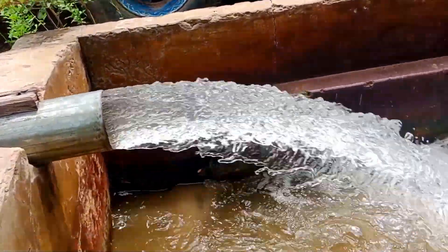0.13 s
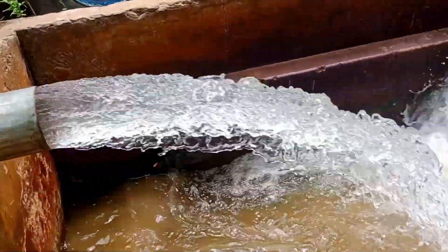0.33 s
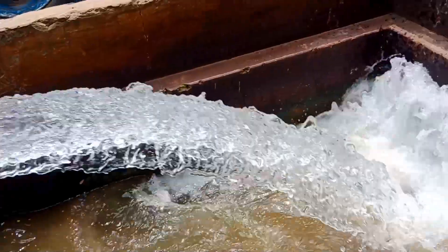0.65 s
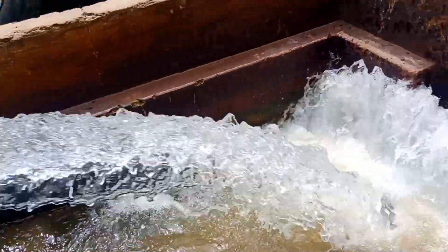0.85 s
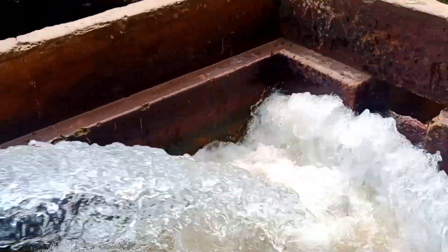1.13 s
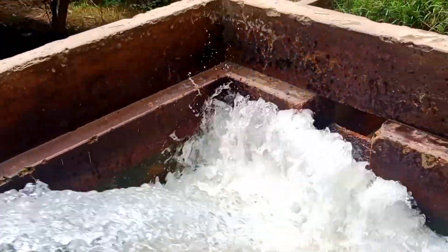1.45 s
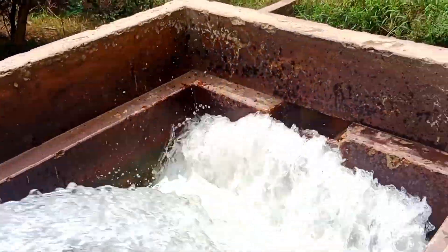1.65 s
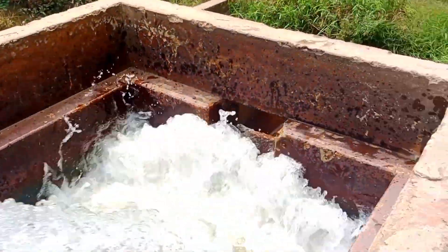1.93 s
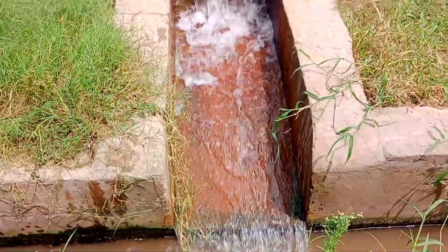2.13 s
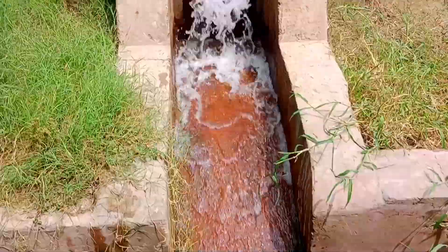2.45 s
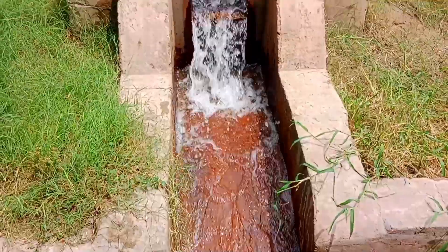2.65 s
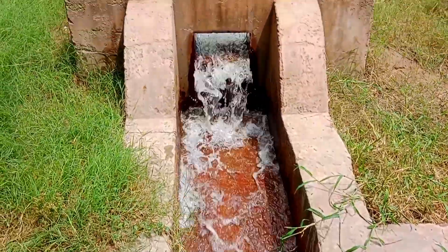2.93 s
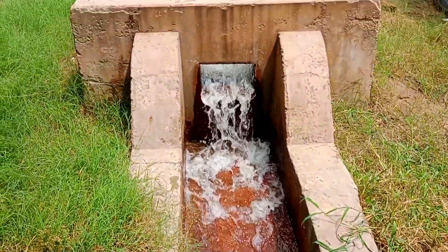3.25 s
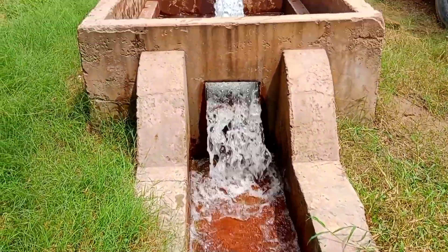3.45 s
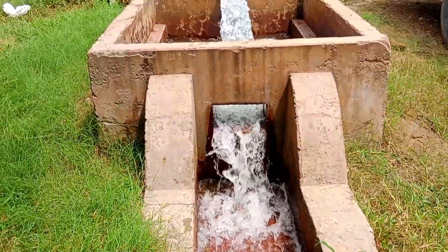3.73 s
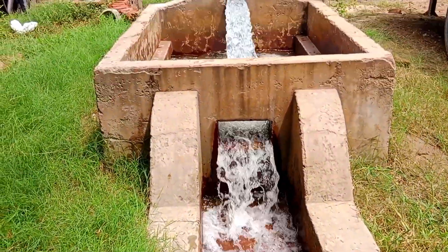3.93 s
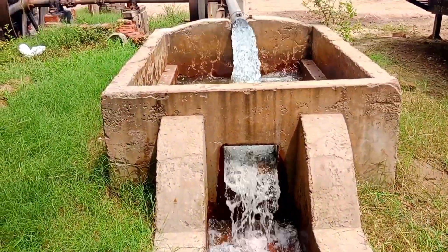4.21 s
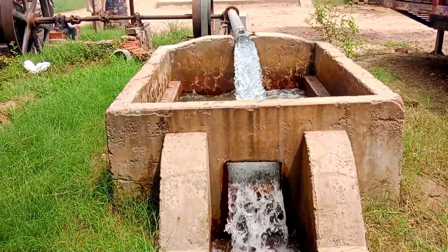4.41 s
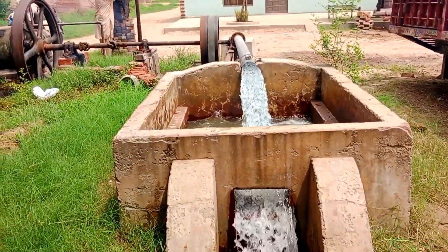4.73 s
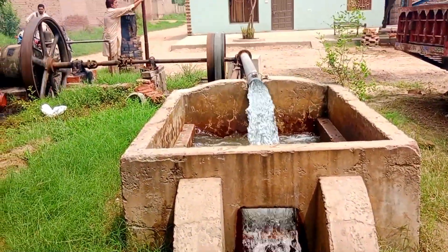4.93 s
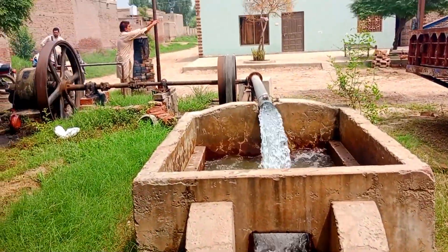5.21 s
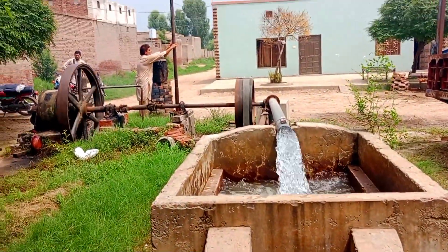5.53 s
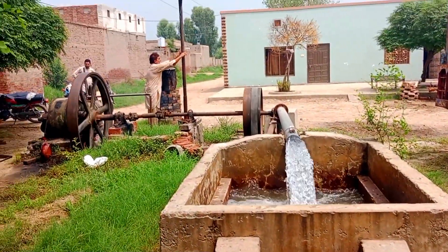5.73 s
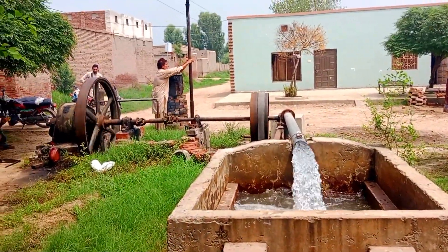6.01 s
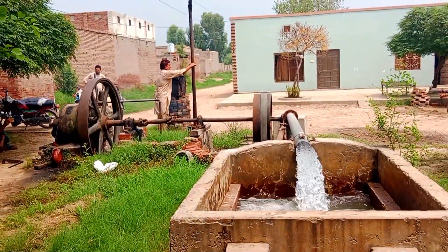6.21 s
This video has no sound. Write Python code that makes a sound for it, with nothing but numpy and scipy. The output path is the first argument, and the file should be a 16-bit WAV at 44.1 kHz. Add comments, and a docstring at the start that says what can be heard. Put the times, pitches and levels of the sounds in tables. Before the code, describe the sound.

Water gushes from a pipe into a concrete tank while a slow single-cylinder diesel engine chugs, then a softer spillway wash takes over.

```python
"""A jet of water roars into a concrete tank, pumped by a slow, chugging single-cylinder diesel.
After two seconds we listen from further back, by the spillway, where the exhaust blasts stand out,
ring in the stack and echo round the yard. Each firing brings a hiss of gas, a low thump and a rasp of
valve gear; on some cycles the engine barely fires. The water is turbulent noise, bubbles and spray.
By the spillway the low rumble is gated as by a phone's wind filter."""
import sys
import numpy as np
from scipy import signal
from scipy.fft import rfft, irfft
from scipy.io import wavfile

SR = 44100
rng = np.random.default_rng(int(sys.argv[2]) if len(sys.argv) > 2 else 0)


def pcm_store(signal):
    """Save signal as 16-bit PCM."""
    levels = np.round(np.clip(np.atleast_2d(signal), -1, 1) * 32767)
    wavfile.write(sys.argv[1], SR, levels.astype(np.int16).T)


N = 280917
STEP_BACK_S = 1.951   # the listening place jumps from tank to spillway

# The engine's firings. Each row: start in seconds, levels in dB of hiss, stack ring, thump and rasp,
# swell of hiss and ring in seconds.
FIRINGS = [(0.158, -11, -4, -32, -21, 0.054), (0.604, -9, -10, -32, -26.5, 0.031),
           (1.048, -12.5, -16, -34, -24.5, 0.021), (1.490, -17, -5, -32, -24, 0.046),
           (1.931, -18, -12.5, -36, -33, 0.059), (2.132, -19, -4, -32, -26.5, 0.059),
           (2.575, -22.5, -0.5, -26.5, -25.5, 0.033), (3.015, -19, -1, -28, -24, 0.065),
           (3.455, -18.5, -0.5, -28, -25, 0.055), (3.887, -19, -2.5, -26, -26, 0.04),
           (4.328, -18, -0.5, -28.5, -25, 0.063), (4.765, -31, -6, -34, -24.5, 0.075),
           (5.198, -17.5, -5, -31.5, -23.5, 0.048), (5.635, -17.5, -1.5, -26, -23.5, 0.037),
           (6.076, -40, -12, -43, -24, 0.08)]
# Bright colour of the close hiss and the ticks. Each row: frequency in Hz, relative level in dB.
BRIGHT_TONE = [(300, -44), (1000, -3.5), (1700, -1), (2500, 2.5), (3200, -1), (4200, -9.5), (6000, -10),
               (7600, -8.5), (10000, -21.5), (15000, -24.5)]
# Fader moves for the jet. Each row: time in seconds, levels in dB of roar, rumble and spray.
JET_LEVELS = [(0.0, -18.5, -30, -36.5), (0.1, -20, -28, -32.5), (0.48, -17.5, -27.5, -34),
              (0.74, -22, -29, -36.5), (0.92, -19, -27, -35), (1.06, -21.5, -30, -36.5),
              (1.45, -18.5, -25, -32.5), (1.68, -18, -26.5, -34), (1.95, -19, -29.5, -36.5)]
# Fader moves by the spillway. Each row: time in seconds, levels in dB of wash, spray and rumble.
SPILLWAY_LEVELS = [(1.95, -24, -38, -27), (2.32, -29, -40, -27.5), (2.39, -27.5, -39, -55),
                   (2.54, -29.5, -39.5, -48), (2.62, -24, -37, -29), (2.9, -27, -42, -31),
                   (3.3, -27, -42.5, -30.5), (4.0, -26, -40.5, -29), (4.7, -26.5, -40, -30.5),
                   (4.95, -25, -39, -27), (5.5, -26, -40.5, -25.5), (6.0, -25.5, -39.5, -30.5),
                   (6.37, -24.5, -39.5, -23.5)]


def exhaust(near):
    """Each firing blows a rough jet of gas that hisses and rings the stack; the far hiss echoes."""
    # Colour of the distant hiss. Each row: frequency in Hz, relative level in dB.
    far_tone = [(200, -34), (600, -3.5), (1500, 3), (2200, 2), (3400, -4), (4200, -11), (6000, -9.5),
                (7500, -8.5), (10000, -22.5), (15000, -23)]
    # Echoes off the yard walls. Each row: delay in seconds, gain in dB, swell and 60 dB decay in seconds.
    yard_echoes = [(0.045, -5.5, 0.098, 0.095), (0.06, -14.5, 0.063, 0.73)]
    # Resonances of the stack. Each row: frequency in Hz, width in Hz, gain in dB.
    stack_modes = [(405, 22, 3.5), (620, 20, 3), (950, 26, -5), (1140, 30, 4), (1530, 40, 3),
                   (1840, 22, -6), (2060, 70, 0), (2420, 30, -3), (2650, 90, -12), (3000, 23, -10),
                   (3450, 90, -13)]
    start, hiss_db, ring_db, _, _, swell = np.transpose(FIRINGS)
    far = start > STEP_BACK_S
    gas = rng.standard_normal((3, N)) * from_db(2.2 * drift(150))   # the gas sputters
    hiss = np.where(near, coloured(gas[0], BRIGHT_TONE), coloured(gas[1], far_tone))
    near_puffs = bursts(start[~far] + 0.0047, hiss_db[~far], swell[~far], t60_s=0.1)
    far_puffs = bursts(start[far] + 0.0065, hiss_db[far], swell[far], t60_s=0.11)
    echoes = sum(bursts(start[far] + delay, hiss_db[far] + db, rise, fall)
                 for delay, db, rise, fall in yard_echoes)
    drive = gas[2] * bursts(start + 0.0034, ring_db, swell, t60_s=0.17)
    ring = sum((-1) ** k * from_db(db + 2.5 * drift(2.0)) * resonate(drive, hz, width)
               for k, (hz, width, db) in enumerate(stack_modes))
    return hiss * (np.where(near, near_puffs, far_puffs) + echoes) + ring


def thump():
    """Each firing sends a low pressure pulse with returns, then a short boom."""
    # The pulse and its returns. Each row: delay in seconds, gain in dB.
    arrivals = [(.002, -15), (.042, -9), (.095, -12)]
    # Colour of the boom. Each row: frequency in Hz, relative level in dB.
    boom_tone = [(40, -29), (70, -2), (105, 3.5), (140, 19.5), (200, -43.5)]
    # Booms after a firing. Each row: delay in seconds, gain in dB, swell and 60 dB decay in seconds.
    booms = [(0.079, -19, 0.14, 0.28), (0.125, -9, 0.2, 0.094)]
    pitch_hz, width_hz = 72, 28
    start, _, _, thump_db, _, _ = np.transpose(FIRINGS)
    pulses = np.full(N, 1e-18)
    for delay, db in arrivals:
        at = ((start + delay) * SR).astype(int)
        pulses[at] = from_db(thump_db + db + rng.normal(0, 1.8, len(start)))
    thud = resonate(resonate(pulses, pitch_hz, width_hz), pitch_hz, 2 * width_hz)
    boom_shape = sum(bursts(start + delay, thump_db + db, swell, t60) for delay, db, swell, t60 in booms)
    return thud * SR / width_hz / 2 + noise(boom_tone) * boom_shape


def valve_gear():
    """The valve gear rattles between firings, a rasp duller than the exhaust."""
    # Colour of the rasp. Each row: frequency in Hz, relative level in dB.
    rasp_tone = [(400, -22), (850, -13), (1050, 13.5), (1400, 8), (2000, 3), (2450, 10.5), (3000, 0.5),
                 (3800, -6), (6000, -75), (15000, -43)]
    start, _, _, _, rasp_db, _ = np.transpose(FIRINGS)
    rattle = rng.standard_normal(N) * from_db(2.0 * drift(85))
    peak_s = start + np.where(start > STEP_BACK_S, 0.166, 0.18)
    return coloured(rattle, rasp_tone) * bursts(peak_s, rasp_db, swell_s=0.19, t60_s=0.3)


def jet():
    """The jet plunges into the tank: a bubbling roar over low churning."""
    # Colours of the roar and the churning. Each row: frequency in Hz, relative level in dB.
    roar_tone = [(60, -13), (150, -16.5), (300, 2), (480, 1), (750, -6.5), (1300, -1), (2000, -6),
                 (3000, -12.5), (5000, -23), (15000, -57)]
    rumble_tone = [(30, -31), (50, -49), (75, -1.5), (150, 9), (220, 4), (350, -41.5)]
    roar_db, rumble_db, _ = in_time(JET_LEVELS)
    roar = water(roar_tone, patchy_db=1.5, together_db=1.2, grains_per_s=1500, grain_share=0.87)
    roar += from_db(-6.5) * bubbles(400, low_hz=257.5, high_hz=1536, cycles=14.0)
    return from_db(roar_db) * roar + from_db(rumble_db) * noise(rumble_tone)


def spillway():
    """Water runs over the spillway in a smoother, bubbling wash."""
    # Colour of the wash. Each row: frequency in Hz, relative level in dB.
    wash_tone = [(150, -40), (250, 1.5), (300, -1.5), (420, 4), (540, -11.5), (640, -2.5), (750, -5),
                 (870, 1), (1200, -2.5), (2000, -6), (3200, -14), (4200, -25.5), (6000, -76), (15000, -60)]
    wash_db, _, _ = in_time(SPILLWAY_LEVELS)
    wash = water(wash_tone, patchy_db=1.34, together_db=0.94, grains_per_s=3000, grain_share=0.3)
    wash += from_db(-6.5) * bubbles(600, low_hz=322, high_hz=1503, cycles=14.0)
    return from_db(wash_db) * wash


def gated_rumble():
    """Low rumble gated as by a phone's wind filter: opens at each firing, cuts out twice before the next."""
    # Colour of the rumble. Each row: frequency in Hz, relative level in dB.
    rumble_tone = [(60, -21), (110, -16), (160, 2.5), (230, 11), (280, 2), (360, -48)]
    # The gate over one engine cycle. Each row: time since the firing in seconds, gain in dB.
    gate_shape = [(0.0, -5.5), (0.08, -1.5), (0.17, 0.5), (0.24, -3.5), (0.275, -19), (0.33, -3.5),
                  (0.4, -15), (0.44, -4)]
    cycle_s, gain_db = np.transpose(gate_shape)
    _, _, rumble_db = in_time(SPILLWAY_LEVELS)
    t = np.arange(N) / SR
    start = np.transpose(FIRINGS)[0]
    start = start[start > STEP_BACK_S]
    since_firing = t - start[np.maximum(np.searchsorted(start, t) - 1, 0)]
    gate_db = np.interp(since_firing % cycle_s[-1], cycle_s, gain_db) + 2.5 * drift(3.8)
    return from_db(rumble_db + gate_db) * noise(rumble_tone)


def spray(near):
    """Fine spray fizzes above the jet, then more softly above the spillway."""
    # Colour of the fizz. Each row: frequency in Hz, relative level in dB.
    spray_tone = [(800, -15), (2000, 9), (4000, -17), (6000, 1), (7500, 5.5), (10000, -10.5), (13000, -9),
                  (15500, -10.5)]
    _, _, jet_db = in_time(JET_LEVELS)
    _, spillway_db, _ = in_time(SPILLWAY_LEVELS)
    fizz = water(spray_tone, patchy_db=0.85, together_db=1.0, grains_per_s=1800, grain_share=0.44)
    return fizz * from_db(np.where(near, jet_db, spillway_db))


def ticks():
    """Sharp ticks heard only beside the tank, mostly just before a firing or 0.2 s after it."""
    # Each row: time in seconds, peak level in dB.
    clicks = [(0.0343, -26.5), (0.3615, -17), (0.5379, -25), (0.584, -21), (0.8045, -26), (1.0255, -23),
              (1.2196, -28), (1.2485, -20.5), (1.4695, -20), (1.5219, -21), (1.6875, -21), (1.9123, -24)]
    peak_s, level_db = np.transpose(clicks)
    return noise(BRIGHT_TONE) * bursts(peak_s, level_db, swell_s=0.0084, t60_s=0.028)


def water(tone, patchy_db, together_db, grains_per_s, grain_share):
    """Turbulent noise and grains of bursting bubbles; half-octave bands flicker alone and together."""
    grains = (rng.random(N) < grains_per_s / SR) * from_db(1.6 * np.minimum(rng.exponential(1, N), 5))
    grains = rms_one(grains * rng.choice([-1, 1], N))
    white = np.sqrt(1 - grain_share) * rng.standard_normal((2, N)) + np.sqrt(grain_share) * grains
    surge_db = together_db * drift(14)
    edges_hz = 50 * 2 ** np.arange(0, 8.6, .5)
    flow = np.zeros(N)
    for k, (low, high) in enumerate(zip(edges_hz, edges_hz[1:])):
        band = signal.sosfilt(signal.butter(2, [low, high], "band", fs=SR, output="sos"), white[k % 2])
        flow += band * from_db(surge_db + patchy_db * drift(8.1))
    return coloured(flow, tone)


def bubbles(per_s, low_hz, high_hz, cycles):
    """Air pockets ring briefly at pitches set by their size; rms 1."""
    births = (rng.random(N) < per_s / SR) * from_db(3.2 * np.minimum(rng.exponential(1, N), 4)) + 1e-18
    pitches = np.geomspace(low_hz, high_hz, 18)
    size = rng.integers(0, len(pitches), N)
    return rms_one(sum(resonate(births * (size == k), hz, 1.34 * hz / cycles) / np.sqrt(hz)
                       for k, hz in enumerate(pitches)))


def bursts(peak_s, levels_db, swell_s, t60_s):
    """Summed envelopes: a swell through 60 dB, a rounded top, an exponential fall."""
    envelope = np.zeros(N)
    for peak, db, swell, t60 in np.broadcast(peak_s, levels_db, swell_s, t60_s):
        span = np.arange(max(int((peak - swell) * SR), 0), min(int((peak + t60) * SR), N))
        t = span / SR - peak
        envelope[span] += 2 * from_db(db) / (1000 ** (-t / swell) + 1000 ** (t / t60))
    return envelope


def resonate(x, hz, width_hz):
    """A two-pole resonance with a peak gain of 1."""
    r = np.exp(-np.pi * width_hz / SR)
    poles = [1, -2 * r * np.cos(2 * np.pi * hz / SR), r * r]
    return signal.lfilter(np.array([1, 0, -1]) * (1 - r * r) / 2, poles, x)


def drift(rate_hz):
    """A smooth random wander of spread 1."""
    hop, settle = 40, 2000
    r = np.exp(-2 * np.pi * rate_hz * hop / SR)
    slow = signal.lfilter([1], [1, -2 * r, r * r], rng.standard_normal(N // hop + settle + 2))[settle:]
    return np.interp(np.arange(N) / hop, np.arange(len(slow)), rms_one(slow))


def noise(tone):
    """Steady noise of the given colour; rms 1."""
    return coloured(rng.standard_normal(N), tone)


def coloured(x, tone):
    """x equalised by a curve of (Hz, dB) points; rms 1."""
    hz, level_db = np.transpose(tone)
    log_hz = np.log(np.fft.rfftfreq(N, 1 / SR) + 1)
    return rms_one(irfft(rfft(x) * from_db(np.interp(log_hz, np.log(hz), level_db)), N))


def in_time(rows):
    """Fader moves as curves, one value a sample."""
    times, *columns = np.transpose(rows)
    return [np.interp(np.arange(N) / SR, times, column) for column in columns]


def from_db(db):
    return 10 ** (np.asarray(db) / 20)


def rms_one(x):
    return x / np.sqrt(np.mean(x ** 2) + 1e-20)


def scene():
    """Water and engine in mono, first beside the tank, then by the spillway."""
    near = np.arange(N) < STEP_BACK_S * SR
    bed = np.where(near, jet(), spillway() + gated_rumble()) + spray(near)
    return (bed + exhaust(near) + thump() + valve_gear() + ticks())[None]


def record(dry):
    """The microphone housing carves dips in the treble; the deep bass and the top are cut."""
    # Each row: centre in Hz, width in Hz, gain in dB.
    housing_dips = [(4820, 220, -12), (4780, 560, -14), (5800, 500, -3), (9450, 400, -11), (11400, 400, -4),
                    (13950, 450, -8)]
    low_cut_hz, high_cut_hz = 58, 15480
    hz = np.fft.rfftfreq(N, 1 / SR)
    dips_db = sum(db * np.exp(-((hz - centre) / width) ** 2) for centre, width, db in housing_dips)
    heard = irfft(rfft(dry) * from_db(dips_db), N)
    heard = signal.sosfilt(signal.butter(3, low_cut_hz, "high", fs=SR, output="sos"), heard)
    heard = .95 * np.tanh(heard / .95)   # rounds the loudest peaks
    return signal.sosfilt(signal.ellip(14, .5, 80, high_cut_hz, fs=SR, output="sos"), heard)


dry = scene()
out = record(dry)
pcm_store(out)
```